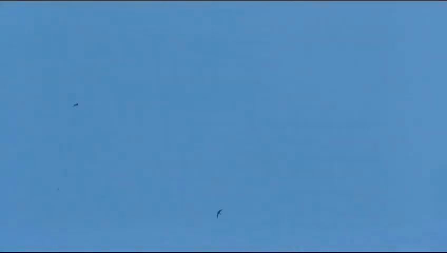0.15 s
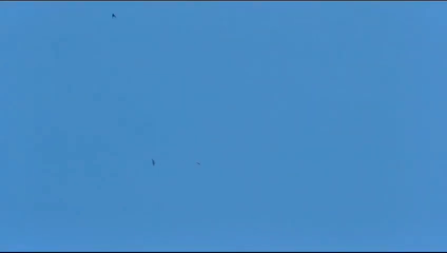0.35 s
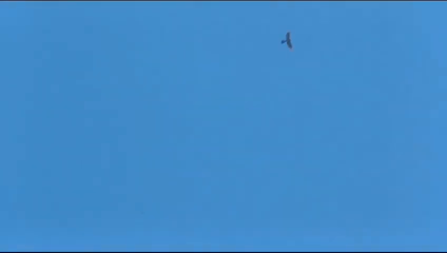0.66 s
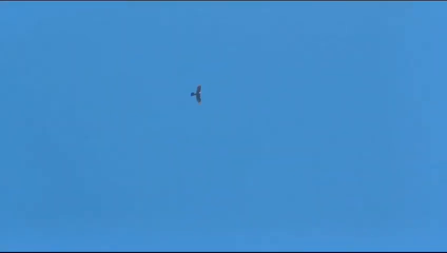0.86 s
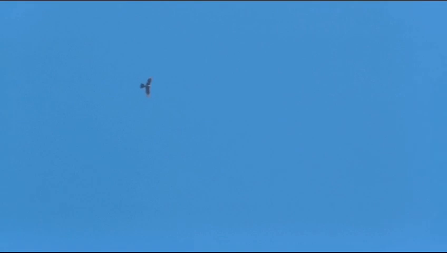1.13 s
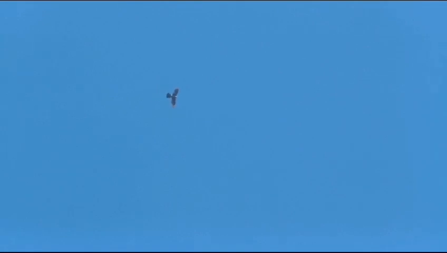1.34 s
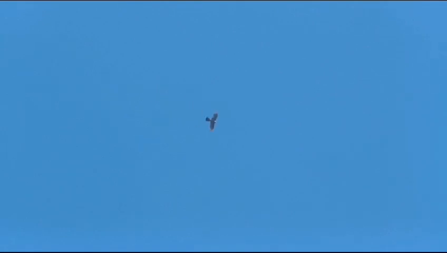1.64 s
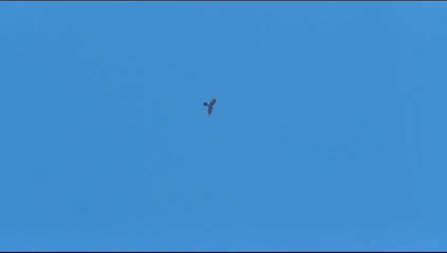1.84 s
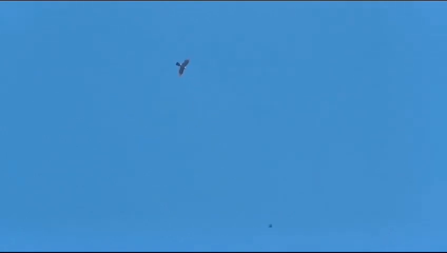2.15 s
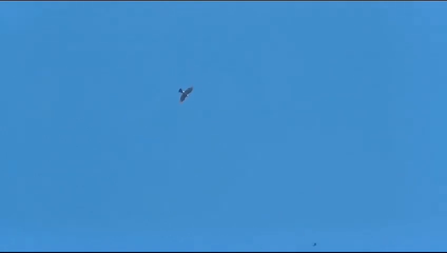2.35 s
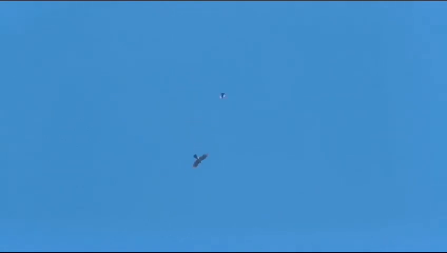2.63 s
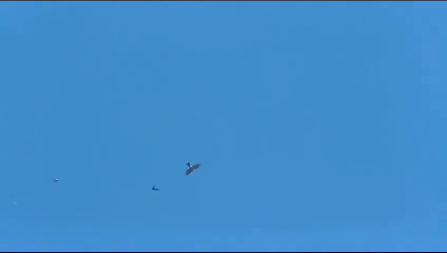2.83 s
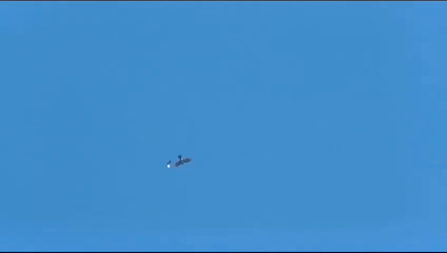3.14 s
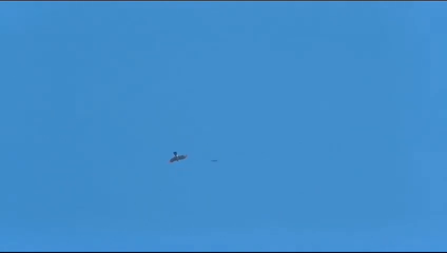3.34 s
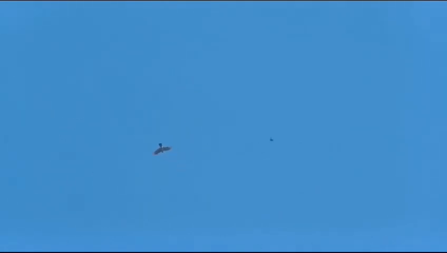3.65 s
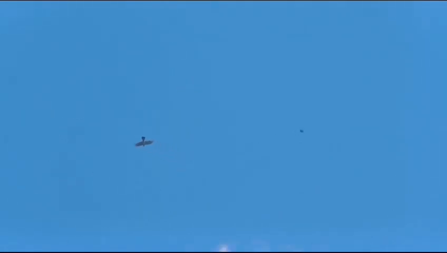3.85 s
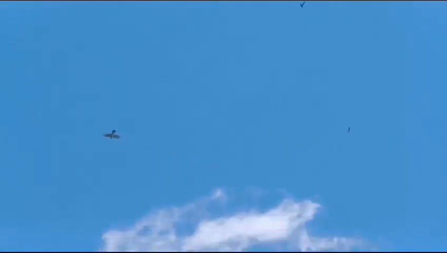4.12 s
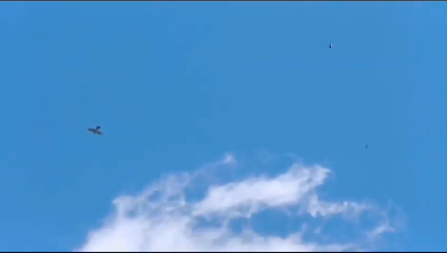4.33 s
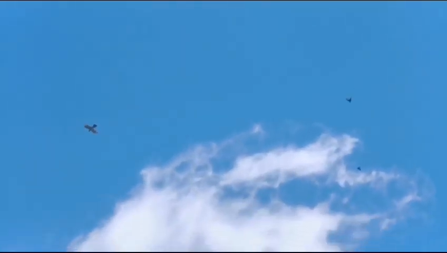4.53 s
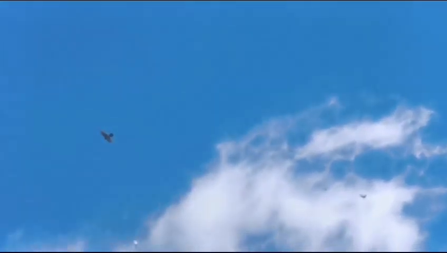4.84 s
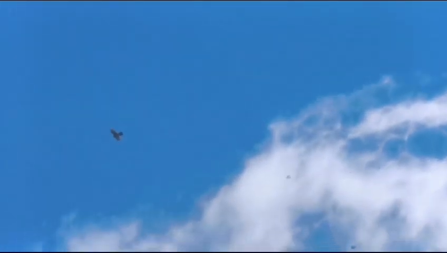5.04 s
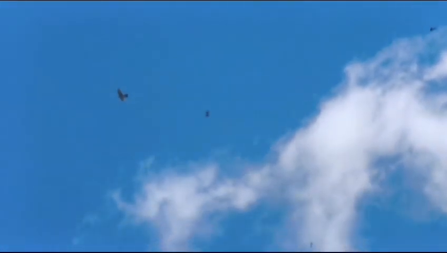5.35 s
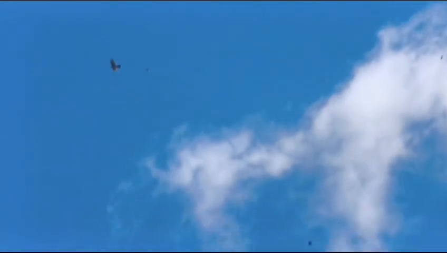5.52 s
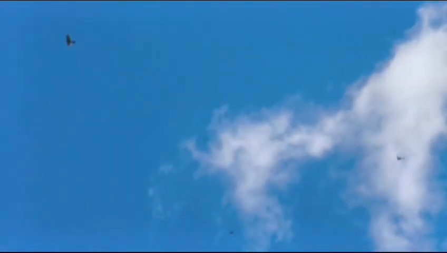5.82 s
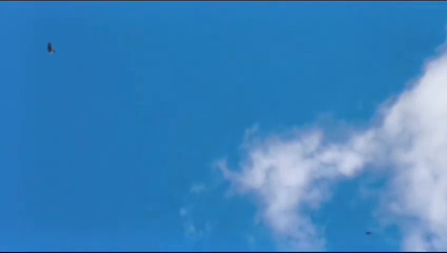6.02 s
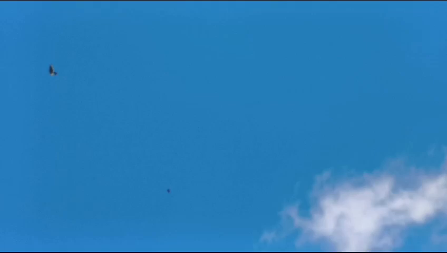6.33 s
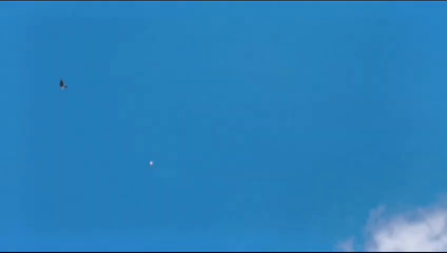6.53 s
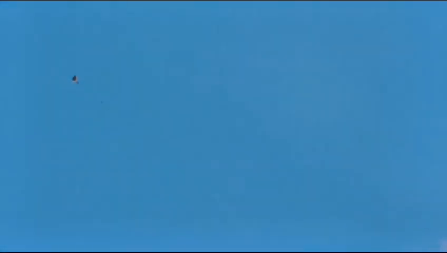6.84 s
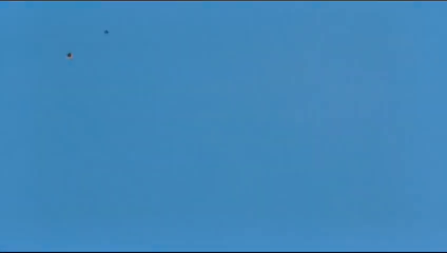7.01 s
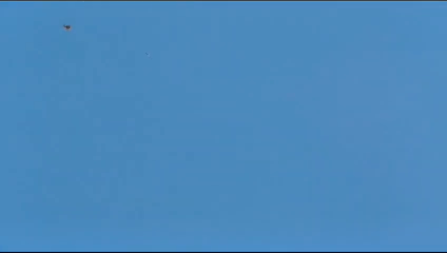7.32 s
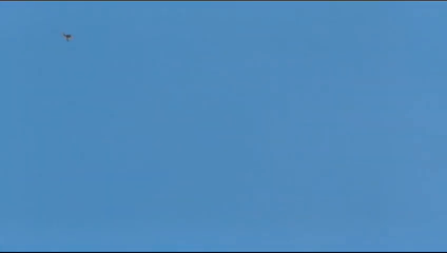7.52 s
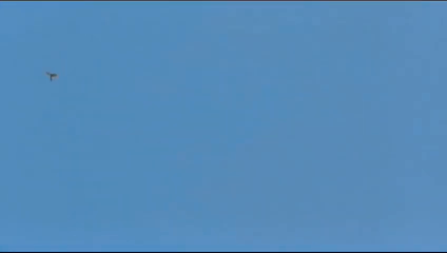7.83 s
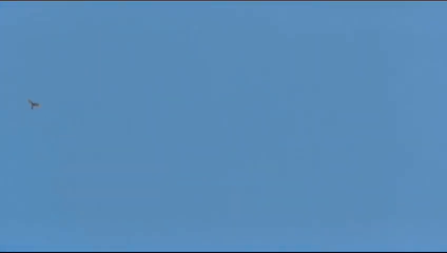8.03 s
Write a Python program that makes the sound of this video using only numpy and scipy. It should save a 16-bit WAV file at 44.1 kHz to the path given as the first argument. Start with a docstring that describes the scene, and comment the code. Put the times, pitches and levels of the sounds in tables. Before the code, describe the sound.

Outdoors, high squeaky swallow chirps repeat over a faint far hum, with one fluted songbird phrase, a dry rasp, and fingers scuffing the microphone.

```python
"""Outdoors among roofs and trees: swallows chirp with both sides of the syrinx at once; one rasps and zips.
A songbird flutes one phrase in settling, burred notes; slurred whistles, mostly far off, and a soft far
warble are gliding sines. Birds get an echo and noise-like scatter.
A far hum wavers, then sinks; filtered noise makes the air.
A finger scuffs, brushes and ticks at the right microphone port; wind puffs catch the left one."""
import sys
import numpy as np
from scipy import signal
from scipy.fft import rfft, irfft
from scipy.io import wavfile
from scipy.ndimage import uniform_filter1d, map_coordinates

SR = 44100
rng = np.random.default_rng(int(sys.argv[2]) if len(sys.argv) > 2 else 0)


def transcribe(signal):
    """Save signal, clipped to [-1, 1], as a 16-bit WAV file at the path in sys.argv[1]."""
    frames = np.atleast_2d(signal).T
    limited = np.clip(frames, -1, 1)
    pcm = np.round(limited * 32767).astype(np.int16)
    wavfile.write(sys.argv[1], SR, pcm)


N = 360297

# swallow chirps: (time [s], nominal length [s], low voice top [Hz], low voice level [dB],
# high voice level [dB], high voice dip at the crest [dB])
CHIRP_EVENTS = [(0.718, 0.12, 5450, -39, -50, -13), (0.92, 0.1, 5190, -48.5, -50.5, -12.5),
                (1.587, 0.12, 5350, -45, -54.5, -16), (1.794, 0.099, 4980, -56.5, -55, -12.5),
                (2.493, 0.09, 5490, -46.5, -46, -11), (2.679, 0.1, 5000, -53, -55, -11),
                (3.395, 0.11, 5510, -57.5, -62, -18), (3.589, 0.084, 4830, -58.5, -55, -14),
                (3.796, 0.1, 5300, -56.5, -59, -14), (4.617, .11, 5400, -48.5, -55, -15),
                (4.824, 0.12, 5130, -59.5, -62.5, -16), (5.466, 0.068, 5200, -69, -78, -9),
                (5.775, .1, 5430, -60.5, -69, -11), (5.979, 0.091, 5540, -60, -67, -6),
                (6.126, .1, 5510, -43.5, -49.5, -2), (6.209, .106, 5150, -52, -53.5, -9),
                (6.462, 0.086, 5540, -46, -52, -25), (6.726, 0.079, 4720, -60, -48, -21),
                (7.294, 0.097, 5460, -48.5, -59, -21), (7.454, 0.11, 5310, -51, -56, -6),
                (7.499, 0.11, 5230, -48, -49, -16), (7.819, 0.098, 5395, -50.5, -57, -21),
                (8.139, 0.093, 5520, -52, -56, -17)]
# arch of each voice: (share of nominal length [-], share of top pitch [-], relative level [dB])
LOW_VOICE_ARCH = [(.05, .70, -20), (.11, .86, -5), (.19, .97, 0), (.29, 1, 0), (.52, .95, 0),
                  (.66, .875, 0), (.77, .79, -3), (.84, .69, -22)]
HIGH_VOICE_ARCH = [(0, .56, -14), (.08, .84, -1), (.18, .98, -2), (.42, 1, 0), (.69, .93, -1),
                   (.83, .81, 3), (.95, .67, 1), (1.03, .58, -13)]
# syllables of the rasp: (time [s], level [dB])
RASP_SYLLABLES = [(2.391, -46), (2.447, -44.5), (2.503, -45), (2.561, -44.5), (2.622, -47.5)]
# the two voices of every syllable: (start [Hz], goal [Hz], relative level [dB])
SYLLABLE_VOICES = [(2304, 4000, -0.5), (4700, 5900, -4.5)]
# hoarse downward zips: (time [s], length [s], level [dB])
ZIP_EVENTS = [(0.691, 0.029, -52.5), (2.795, .044, -50.5), (2.808, .062, -48)]
# songbird phrase: (time [s], length [s], attack [s], onset [Hz], held [Hz], sag [Hz/s],
# level [dB], trill depth [Hz], warble depth [Hz])
SONG_NOTES = [(.985, 0.17, 0.033, 2190, 2124, 2000, -43, 84, -7),
              (1.227, 0.16, 0.062, 2053, 2118, 0, -31.5, 43, 115),
              (1.486, 0.07, .055, 4610, 5080, 0, -43, 130, -10),
              (1.549, .138, 0.013, 3200, 3050, 1000, -37.5, 163, -3),
              (1.812, .147, 0.034, 2060, 2036, 598, -39.5, 96, -2),
              (1.961, 0.19, 0.036, 2830, 2604, -4, -31.5, 11, 1),
              (2.142, 0.14, 0.035, 2110, 2206, -6.5, -31.5, 4, 2)]
# songbird overtones at full strength: (multiple [-], relative level [dB])
SONG_OVERTONES = [(2, -32), (4, -48), (5, -46)]
# slurred whistles, mostly far off; the one at 7.493 s is the crest of a swallow chirp:
# (time [s], length [s], start [Hz], end [Hz], level before a shared lift [dB])
SLUR_EVENTS = [(0.221, .1, 3400, 3580, -60), (0.251, .064, 1096, 1108, -57),
               (0.608, .16, 2910, 4000, -58.5), (0.952, .051, 2740, 2747, -56),
               (1.68, 0.098, 3070, 4270, -57), (3.833, .21, 2850, 4100, -58.5),
               (5.016, .15, 3050, 4360, -56), (5.465, 0.098, 3116, 3210, -66.5),
               (5.625, .06, 2060, 2120, -61), (5.741, .08, 2240, 2524, -63), (6.089, 0.13, 2860, 3910, -55),
               (7.127, .13, 3150, 4190, -55.5), (7.493, 0.045, 6150, 6650, -50.5)]
# bouts of distant songbirds: (time [s], length [s], middle pitch [Hz], level [dB])
CHORUS_BOUTS = [(0, 2.8, 2550, -67.5), (5.05, .25, 2280, -61.5), (5.751, .55, 2273, -65.5),
                (6.351, 1.8, 2880, -66), (7.352, .4, 2933, -59.5)]
# finger scuffs pressing on the port: (time [s], length before a short tail [s], start level [dB],
# end level [dB], treble shelf [dB])
SCUFF_EVENTS = [(.047, 0.02, -23, -9.5, -6), (0.066, 0.028, -14.5, -32, -3),
                (0.344, 0.016, -27.5, -27.5, 0), (.355, 0.037, -30.5, -31.5, 2),
                (7.729, 0.017, -32.5, -42, 6), (7.741, 0.051, -37.5, -56, 9.5)]
# spectrum of a scuff: (frequency [Hz], relative level [dB])
SCUFF_SPECTRUM = [(25, 3), (65, 5.5), (110, 7), (220, -6.5), (600, 3), (1400, -2.5), (2300, -2),
                  (3500, -11), (5500, -10.5), (7800, -25), (11000, -12), (13500, -25), (16000, -32)]
# skin brushing the case: (time [s], length [s], level [dB], top octave shelf [dB])
BRUSH_EVENTS = [(0.009, 0.074, -34.5, -4), (.233, 0.062, -53, -5), (0.301, 0.13, -43, -4),
                (.553, 0.034, -47.5, 3), (0.641, 0.13, -57, 13.5), (0.731, .25, -52.5, 5),
                (1.336, .13, -59.5, 3), (4.906, .047, -56, 4), (6.027, 0.073, -57, 0),
                (6.315, 0.072, -57, 4), (7.585, 0.22, -52.5, 9.5), (8.026, 0.087, -64.5, 13)]
# spectrum of a brush: (frequency [Hz], relative level [dB])
BRUSH_SPECTRUM = [(200, -2), (1200, -7), (2500, 1), (4000, -4), (6000, -6.5), (7800, -26), (11000, -11.5),
                  (13000, -23.5), (16000, -36)]
# ticks of the case under the grip: (time [s], level [dB])
TICK_EVENTS = [(0.862, -45), (1.09, -48), (1.4257, -48.5), (7.6311, -46), (7.7043, -38), (7.7197, -39)]
# spectrum of ticks and grip rustle: (frequency [Hz], relative level [dB])
TICK_SPECTRUM = [(300, -7), (2500, -1.5), (5500, 3), (7800, -6), (11000, 2), (16000, -15)]
# spells of restless grip: (time [s], length [s], level [dB])
FIDGET_SPELLS = [(0, 1.32, -70), (2.2, 0.8, -72), (6.695, 2.7, -71)]
# wind puffs on the left port: (peak time [s], level [dB])
PUFF_EVENTS = [(2.1, -38.5), (2.3, -35), (2.43, -37), (3.67, -41)]
# spectrum of wind: (frequency [Hz], relative level [dB])
PUFF_SPECTRUM = [(15, -11), (32, 6), (60, -8), (120, -21), (300, -73), (1000, -68)]
# outdoor background: (frequency [Hz], relative left level [dB], relative right level [dB],
# likeness of the sides, limited to +-1 in use [-])
AIR_SPECTRUM = [(25, -2.5, -3.5, 0.71), (57.4, -1.5, -3, 0.9), (135, -13, -14, 0.82),
                (298, -14, -14.5, 0.86), (322, -17, -17.5, 0.55), (500, -20.5, -16, 0.3),
                (870, -20.5, -15.5, 0.012), (1520, -26, -22.5, -0.38), (2320, -32.5, -19, -0.12),
                (4370, -36, -28, -0.12), (5600, -43, -30.5, 0.047), (7900, -42, -45.5, -0.33),
                (10700, -47, -35.5, 0.46), (13500, -43, -38.5, -1.1), (16000, -43.5, -40.5, 0)]

NEAR_DB, HIGH_TOP_HZ = -41, 6810  # level of a near chirp; crest of the high voice
SYLLABLE_S, SLIDE_S = 0.056, 0.019
RASP_HZ, RASP_SWING_HZ, RASP_ROUGH_HZ = 400, 570, 406  # flutter rate; its depths for a 4 kHz voice
ZIP_FROM_HZ, ZIP_TO_HZ = 6900, 4200
SETTLE_S, ATTACK_DB, WARBLE_HZ = 0.01565, -11.5, 10.3  # pitch settling; start of the note's swell
FLICK_SHARE, FLICK_IN_S, FLICK_OUT_S = 0.11, 0.008, 0.013  # pitch flick up into a note and down out of it
TRILL_SHARE = 0.056  # mean trill rate as a share of the pitch
ECHO_S, EARLY_S = 0.11, 0.05
CHORUS_NOTES_PER_S = 27
GRIP_DB, FIDGET_RAMP_S = -79.5, 0.2
PUFF_RISE_S, PUFF_FALL_S, BREEZE_DB = 0.029, 0.04, -67
HUM_HZ, HUM_DB = 391, -68.5
HUM_FADES_S, HUM_FADE_LENGTH_S, HUM_DROP_DB = 6.6, 0.26, -13
AIR_DB, TOP_HZ = -57, 15850


def undb(db):
    """Decibels to gain."""
    return 10 ** (np.asarray(db) / 20)


def unit(x):
    """Scale to rms 1."""
    return x / np.sqrt(np.mean(x ** 2))


def clock(length_s):
    """Sample times of a sound of this length."""
    return np.arange(max(int(length_s * SR), 8)) / SR


def read(table, at):
    """Interpolate every column linearly over the first."""
    key, *columns = np.transpose(table)
    return [np.interp(at, key, column) for column in columns]


def across(table, size):
    """Columns of a frequency table on transform bins, linear in log frequency."""
    rows = np.array(table, float)
    log_rows = np.c_[np.log(rows[:, 0]), rows[:, 1:]]
    return read(log_rows, np.log(np.fft.rfftfreq(size, 1 / SR) + 1))


def colour(x, spectrum):
    """Give a sound a spectrum, at rms 1."""
    gain = undb(across(spectrum, len(x))[0])
    return unit(irfft(rfft(x) * gain, len(x)))


def shelf(x, corner_hz, db):
    """Raise or lower everything above a corner."""
    high = signal.sosfiltfilt(signal.butter(2, corner_hz, "high", fs=SR, output="sos"), x)
    return x + (undb(db) - 1) * high


def wander(t, rate_hz):
    """Smooth random curve of spread near 1."""
    knots = rng.standard_normal(int(t[-1] * rate_hz) + 4)
    return map_coordinates(knots, [t * rate_hz], order=2, mode="nearest")


def turn(hz):
    """Phase of an oscillator that follows a pitch."""
    return 2 * np.pi * np.cumsum(hz) / SR


def gate(t, rise_s, fall_s):
    """Flat envelope with sloped ends."""
    return np.clip(t / rise_s, 0, 1) * np.clip((t[-1] - t) / fall_s, 0, 1)


def add(track, time_s, sound):
    """Lay a sound on a track at a time."""
    start = max(int(time_s * SR), 0)
    track[start:start + len(sound)] += sound[:max(N - start, 0)]


def swallows(waver=0.0058, flutter_db=2.5, distance_share=0.49):
    """Two independent whistles arch up and fall together; faint chirps send relatively more to the scatter."""
    direct, far = np.zeros((2, N))
    for time_s, length_s, low_hz, low_db, high_db, dip_db in CHIRP_EVENTS:
        t = clock(length_s * 0.96)
        distance_db = distance_share * (NEAR_DB - max(low_db, high_db))
        voices = ((LOW_VOICE_ARCH, low_hz, low_db, 0),
                  (HIGH_VOICE_ARCH, HIGH_TOP_HZ, high_db, dip_db))
        for arch, top_hz, db, crest_db in voices:
            pitch, shape_db = read(arch, t / length_s)
            hz = top_hz * uniform_filter1d(pitch, size=220) * (1 + waver * wander(t, 500))
            crest = np.clip((pitch - 0.82) / 0.13, 0, 1)
            shape_db = shape_db + crest_db * crest + flutter_db * wander(t, 233)
            voice = np.sin(turn(hz)) * undb(db + shape_db) * gate(t, 0.0017, 0.0014)
            add(direct, time_s, voice)
            add(far, time_s, voice * undb(distance_db))
    return direct, far


def rasp():
    """A swallow scolds in a quick run of two-voiced syllables; single hoarse zips slide downward."""
    out = np.zeros(N)
    for time_s, db in RASP_SYLLABLES:
        for start_hz, goal_hz, voice_db in SYLLABLE_VOICES:
            voice = hoarse(SYLLABLE_S, SLIDE_S, start_hz, goal_hz)
            add(out, time_s, voice * undb(db + voice_db))
    for time_s, length_s, db in ZIP_EVENTS:
        add(out, time_s, hoarse(length_s, length_s, ZIP_FROM_HZ, ZIP_TO_HZ) * undb(db))
    return out


def hoarse(length_s, slide_s, start_hz, goal_hz, grain_db=3.0, patchy_db=1.5, pulse_db=3.0, overtone_db=-25):
    """The pitch slides to its mark while a fast uneven flutter tears the voice into sidebands."""
    t = clock(length_s)
    slide_hz = start_hz + np.clip(t / slide_s, 0, 1) * (goal_hz - start_hz)
    flutter = turn(RASP_HZ * (1 + 0.214 * wander(t, 298)))
    tear_hz = RASP_SWING_HZ * np.sin(flutter) + RASP_ROUGH_HZ * wander(t, 2196)
    tear_hz *= (4000 / max(start_hz, goal_hz)) ** 1.25  # lower voices are rougher
    phase = turn(slide_hz + tear_hz * np.clip(t / 0.0094, 0, 1))
    voice = np.sin(phase) + undb(overtone_db) * (np.sin(2 * phase) + 0.5 * np.sin(3 * phase))
    swell_db = pulse_db * np.cos(flutter / 2)  # strong and weak cycles alternate
    swell_db += grain_db * wander(t, 1380) + patchy_db * wander(t, 155)
    return voice * undb(swell_db) * gate(t, 0.011, 0.0036)


def songbird(waver=0.0044, flutter_db=2.0, bright_hz=2460):
    """Nearly pure notes swell and settle, with trill and warble; overtones weaken steeply below bright_hz."""
    out = np.zeros(N)
    for time_s, length_s, attack_s, onset_hz, held_hz, sag_hz_per_s, db, trill_hz, warble_hz in SONG_NOTES:
        t = clock(length_s)
        hz = held_hz + (onset_hz - held_hz) * np.exp(-t / SETTLE_S) - sag_hz_per_s * t
        hz = hz + warble_hz * np.cos(2 * np.pi * WARBLE_HZ * t)
        hz = hz * (1 - FLICK_SHARE * (1 - gate(t, FLICK_IN_S, FLICK_OUT_S)))
        trill = np.sin(turn(TRILL_SHARE * hz * (1 + 0.15 * wander(t, 80))))
        phase = turn(hz * (1 + waver * wander(t, 152.5)) + trill_hz * trill)
        overtones = sum(undb(k_db) * np.sin(round(k) * phase) * (k * hz < SR / 2)
                        for k, k_db in SONG_OVERTONES)
        voice = np.sin(phase) + overtones * np.clip(hz / bright_hz, 0, 1) ** 8
        swell_db = ATTACK_DB * np.clip(1 - t / attack_s, 0, 1) + flutter_db * wander(t, 92)
        add(out, time_s, voice * undb(db + swell_db) * gate(t, 0.003, FLICK_OUT_S))
    return out


def slurred_whistles(waver=0.028, lift_db=2):
    """Wavering sines swell and fade as they slide."""
    out = np.zeros(N)
    for time_s, length_s, start_hz, end_hz, db in SLUR_EVENTS:
        t = clock(length_s)
        hz = np.linspace(start_hz, end_hz, len(t)) * (1 + waver * wander(t, 399.7))
        envelope = gate(t, 0.29 * length_s, 0.045 * length_s)
        add(out, time_s, np.sin(turn(hz)) * undb(db + lift_db) * envelope)
    return out


def chorus(spread=0.09, glide=0.1007):
    """Bouts of short far gliding notes run together into a soft warble."""
    out = np.zeros(N)
    for start_s, span_s, middle_hz, db in CHORUS_BOUTS:
        draws = rng.random((int(span_s * CHORUS_NOTES_PER_S), 4))
        for k, (when, length, pitch, slide) in enumerate(draws):
            t = clock(0.0296 + 0.0483 * length)
            bend = glide * (2 * slide - 1) * np.linspace(-1, 1, len(t))
            hz = middle_hz * (1 + spread * (2 * pitch - 1) + bend)
            note = np.sin(turn(hz)) * np.hanning(len(t)) * undb(db)
            add(out, start_s + (k + when) / CHORUS_NOTES_PER_S, note)
    return out


def outdoors(x, far, wet_db, left_db, echo_db, t60_s, late_db, lag_samples=14):
    """Direct sound plus an echo and decaying scatter from roofs and trees; left is shaded, its direct late."""
    t = clock(1)
    sides = []
    for lag in (lag_samples, 0):
        # late scatter is weaker: little returns from beyond the nearest roofs
        decay_db = -60 * t / t60_s + late_db * np.clip(t / EARLY_S - 1, 0, 1)
        scatter = rng.standard_normal(len(t)) * undb(decay_db) * np.clip(t / 0.0066, 0, 1)
        response = scatter * undb(wet_db) / np.linalg.norm(scatter)
        response[int(ECHO_S * SR) - lag] += undb(echo_db)  # the echo reaches the left first
        sides.append(np.pad(x, (lag, 0))[:N] + signal.fftconvolve(far, response)[:N])
    return np.array(sides) * undb([[left_db], [0]])


def friction(t, spectrum, grain_db):
    """Dense slips of uneven size, coloured by the case and the port."""
    return colour(rng.standard_normal(len(t)) * undb(grain_db * wander(t, 900)), spectrum)


def finger():
    """Friction scuffs and brushes and decaying noise ticks at the right port; the left barely hears them."""
    out = np.zeros(N)
    for time_s, length_s, start_db, end_db, treble_db in SCUFF_EVENTS:
        t = clock(length_s + 0.0035)
        slips = shelf(friction(t, SCUFF_SPECTRUM, grain_db=-2.5), 3000, treble_db)
        level = undb(np.linspace(start_db, end_db, len(t)))
        add(out, time_s, slips * level * gate(t, 0.00017, 0.012))
    for time_s, length_s, db, top_db in BRUSH_EVENTS:
        t = clock(length_s)
        slips = shelf(friction(t, BRUSH_SPECTRUM, grain_db=3.5), 8500, top_db)
        add(out, time_s, slips * undb(db) * gate(t, 0.2 * length_s, 0.36 * length_s))
    for time_s, db in TICK_EVENTS:
        t = clock(0.028)
        tick = colour(rng.standard_normal(len(t)), TICK_SPECTRUM)
        add(out, time_s, tick * undb(db) * np.exp(-t / 0.0015))
    return out * undb([[-42], [0]])


def grip(uneven_db=3.0, grain_db=5.0):
    """The hand never rests: faint grainy noise rustles on each port, stronger while it fidgets."""
    t = np.arange(N) / SR
    effort = np.full(N, undb(GRIP_DB))
    for time_s, length_s, db in FIDGET_SPELLS:
        edge_s = np.minimum(t - time_s, time_s + length_s - t)
        effort = np.maximum(effort, undb(db) * np.clip(edge_s / FIDGET_RAMP_S, 0, 1))
    grain = undb(grain_db * np.clip(wander(t, 900), -2, 2))
    rustle = unit(rng.standard_normal((2, N)) * grain)
    ports = []
    for side in rustle:
        uneven = undb(uneven_db * np.clip(wander(t, 14), -2, 2))
        ports.append(colour(side, TICK_SPECTRUM) * effort * uneven)
    return np.array(ports) * undb([[-2], [0]])


def wind():
    """Low noise rumbles as a faint breeze on the left port; puffs rise quickly and die away."""
    t = np.arange(N) / SR
    level = undb(BREEZE_DB)
    for peak_s, db in PUFF_EVENTS:
        fade = np.maximum((peak_s - t) / PUFF_RISE_S, (t - peak_s) / PUFF_FALL_S)
        level = level + undb(db) * np.exp(-fade)
    return np.array([colour(rng.standard_normal(N), PUFF_SPECTRUM) * level, np.zeros(N)])


def machine(waver=0.0045, flutter_db=1.9):
    """A far machine hums on one wavering sine, then sinks away."""
    t = np.arange(N) / SR
    fade = np.clip((t - HUM_FADES_S) / HUM_FADE_LENGTH_S, 0, 1)
    db = HUM_DB + HUM_DROP_DB * fade + flutter_db * wander(t, 6.5)
    return np.sin(turn(HUM_HZ * (1 + waver * wander(t, 12)))) * undb(db)


def background(flicker_db=0.36):
    """Far traffic and air: coloured noise, most alike on both sides in the bass."""
    t = np.arange(N) / SR
    left_db, right_db, likeness = across(AIR_SPECTRUM, N)
    likeness = np.clip(likeness, -1, 1)
    mid, side = rfft(rng.standard_normal((2, N))) * np.sqrt([1 + likeness, 1 - likeness])
    spectra = np.array([(mid + side) * undb(left_db), (mid - side) * undb(right_db)])
    return unit(irfft(spectra, N)) * undb(AIR_DB + flicker_db * wander(t, 9.9))


def scene():
    """Birds in the open air, the hand on the case and the background."""
    around = background() + machine() + wind() + grip() + finger()
    chirps, song, harsh, soft = swallows(), songbird(), rasp(), slurred_whistles() + chorus()
    birds = outdoors(*chirps, wet_db=-7, left_db=-11, echo_db=-22, t60_s=0.8, late_db=-5)
    birds += outdoors(harsh, harsh, wet_db=-5, left_db=-12, echo_db=-22, t60_s=0.6, late_db=-2)
    birds += outdoors(song, song, wet_db=-9, left_db=-13, echo_db=-16, t60_s=0.8, late_db=-2)
    birds += outdoors(soft, soft, wet_db=2.0, left_db=-13, echo_db=-8.5, t60_s=0.73, late_db=-0.5)
    return birds + around


def record(dry):
    """The recorder cuts the top with a steep low-pass."""
    return signal.sosfilt(signal.ellip(10, 0.2, 70, TOP_HZ, fs=SR, output="sos"), dry)


dry = scene()
out = record(dry)
transcribe(out)
```